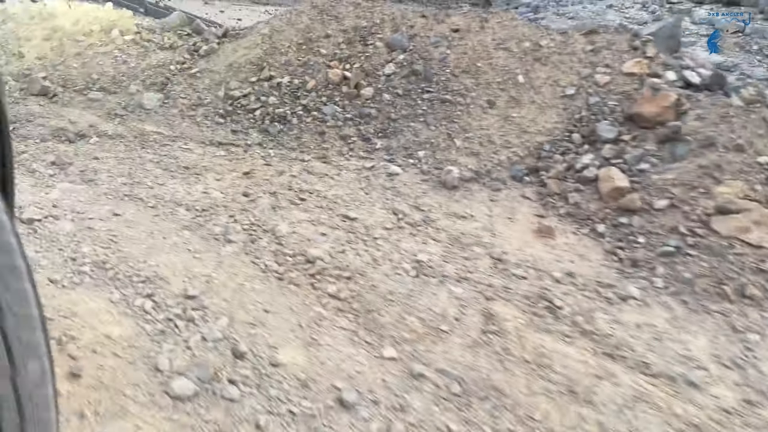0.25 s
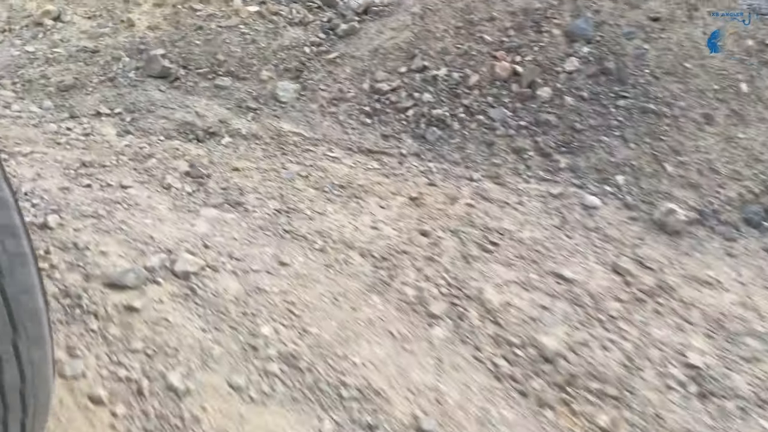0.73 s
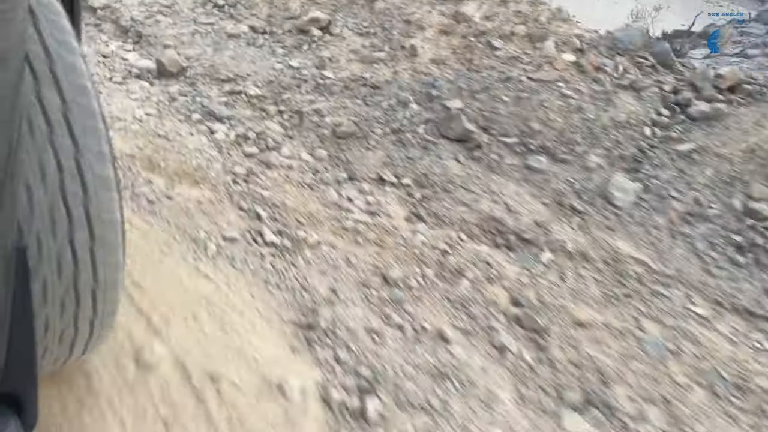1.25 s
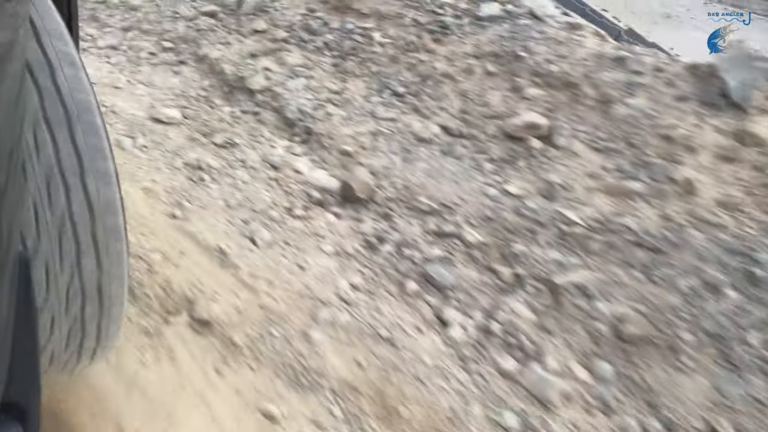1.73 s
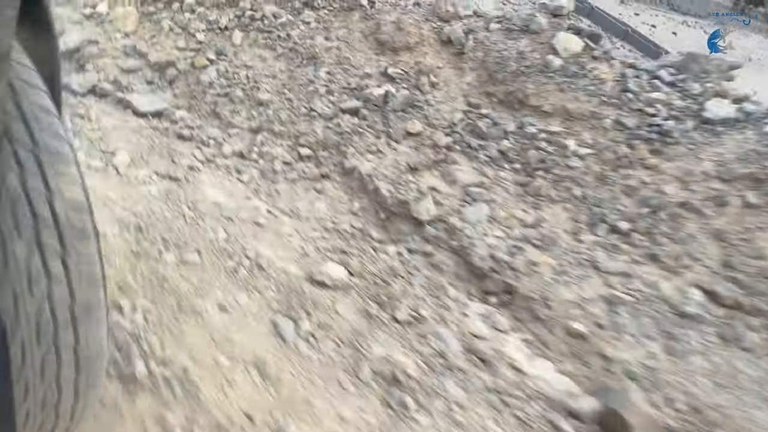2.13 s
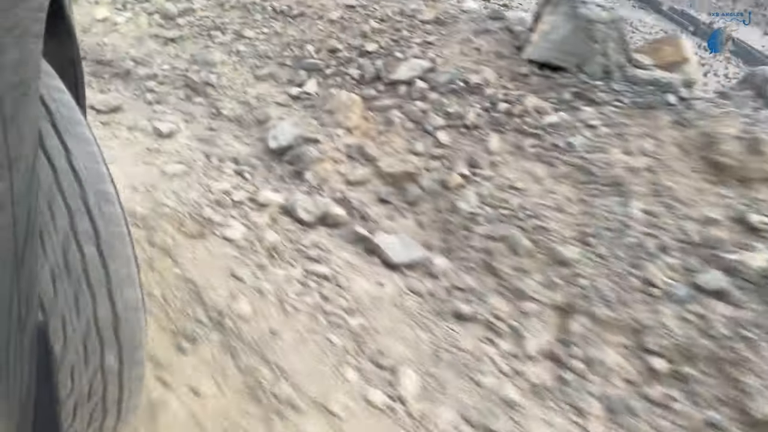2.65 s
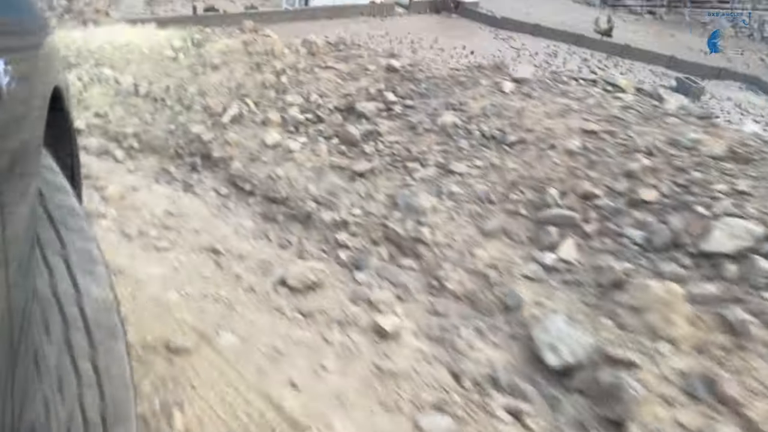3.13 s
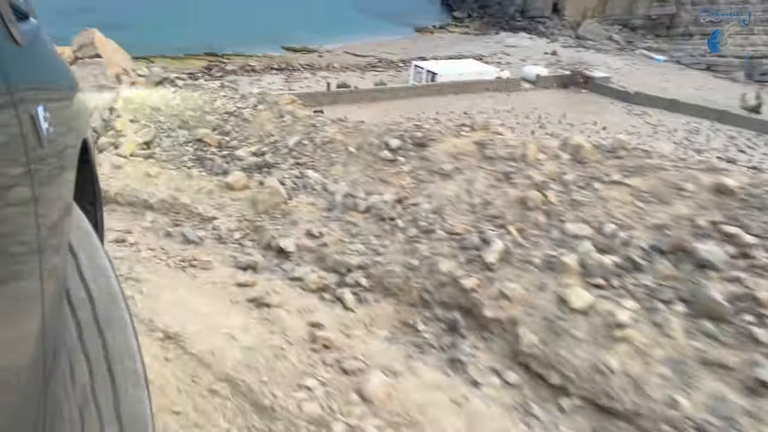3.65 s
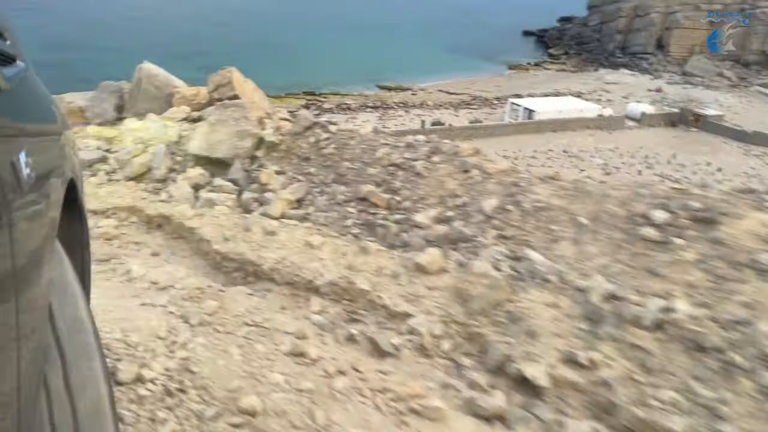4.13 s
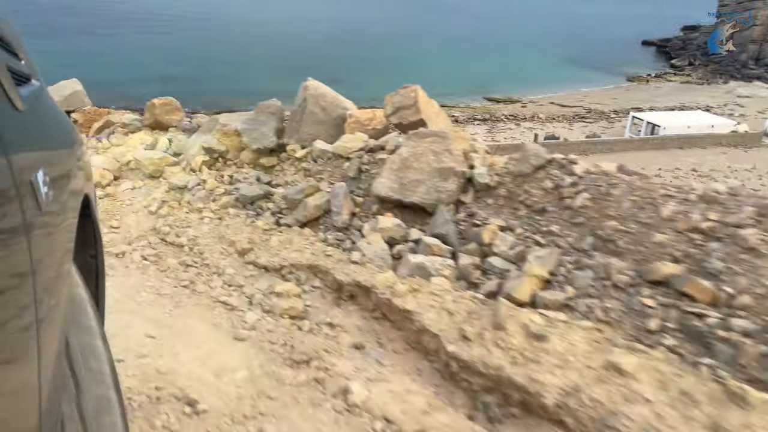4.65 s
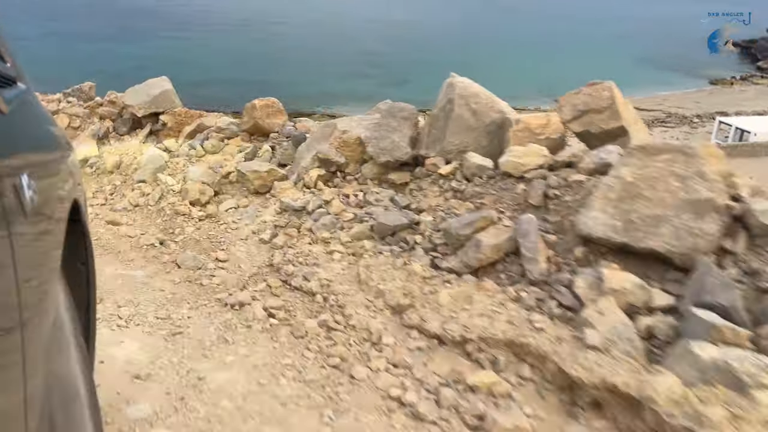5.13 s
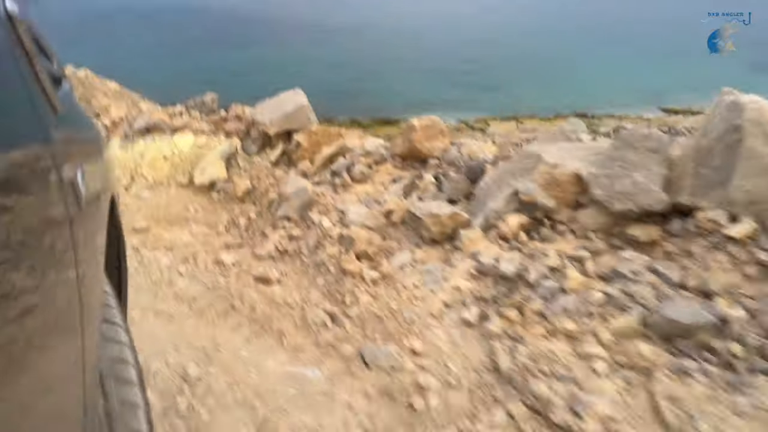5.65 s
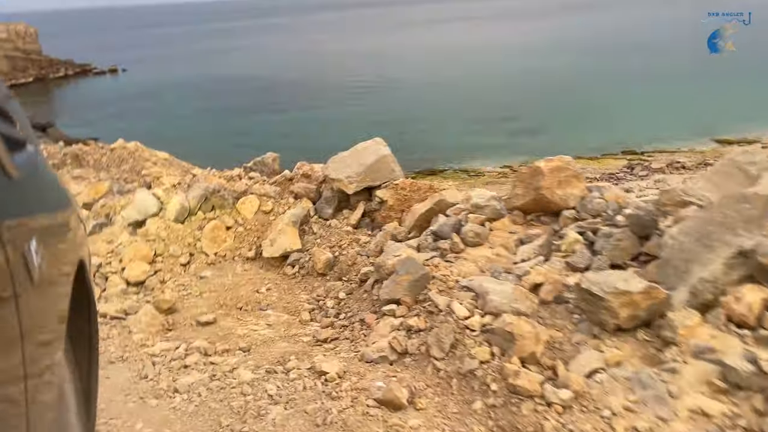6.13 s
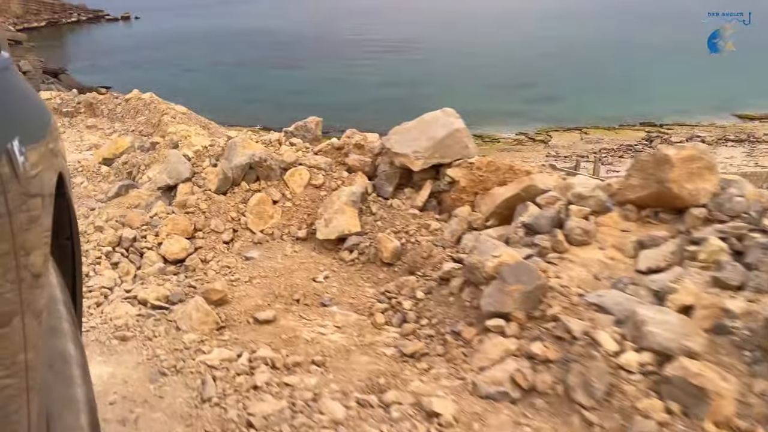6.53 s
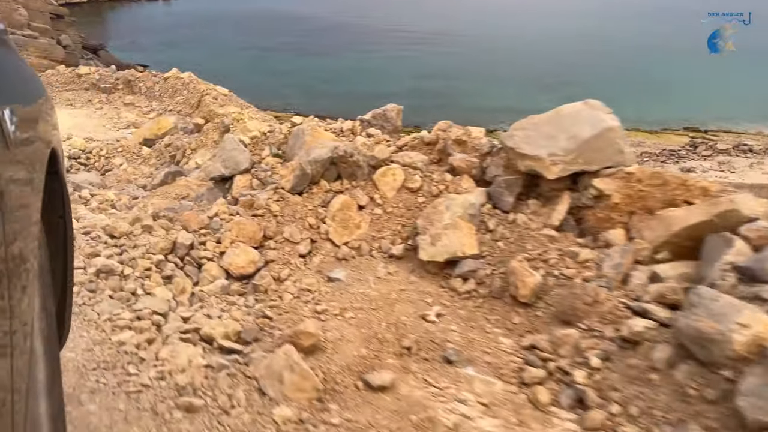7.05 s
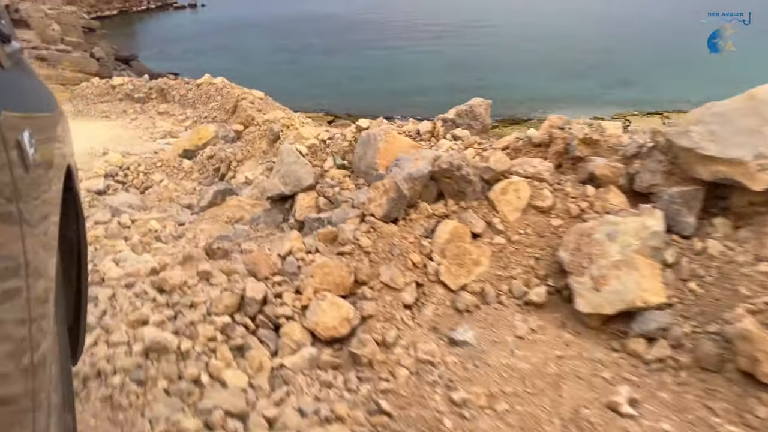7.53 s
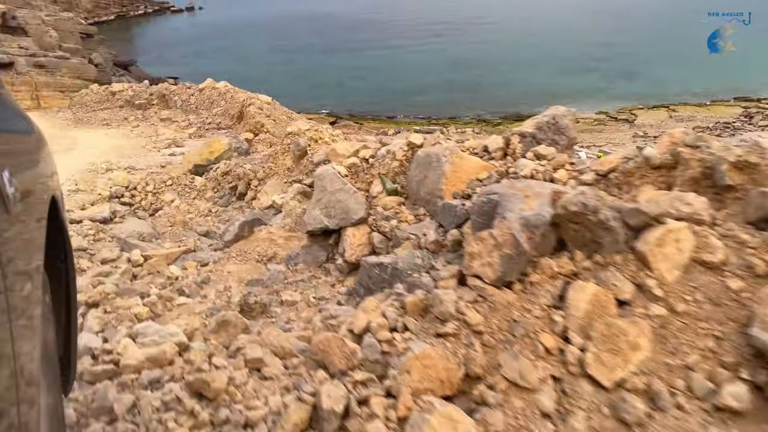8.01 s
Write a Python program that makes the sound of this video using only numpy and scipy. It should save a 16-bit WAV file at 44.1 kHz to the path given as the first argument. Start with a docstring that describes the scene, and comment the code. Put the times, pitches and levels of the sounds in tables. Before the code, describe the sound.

Car tyres roll slowly over loose gravel, stones crunching, popping and snapping under the tread with low thumps and a lumpy rumble beneath.

```python
"""Beside a slowly rolling car on loose gravel and rocks, a two-port microphone held close to the tyres.
Stones grind, snap and pop under the tread: filtered random clicks and short swings that sag in pitch.
The tyre thumps over bigger rocks as low decaying swings, and the bodywork rings through resonators.
Fine grit hisses, small stones tick, and lumpy low noise of car and wind lies below."""
import sys
import numpy as np
from scipy import signal
from scipy.fft import rfft, irfft, next_fast_len
from scipy.io import wavfile

SR = 44100
rng = np.random.default_rng(int(sys.argv[2]) if len(sys.argv) > 2 else 0)


def store_pcm(level_fs):
    """Save levels as 16-bit WAV."""
    pcm = np.round(np.clip(level_fs, -1, 1) * 32767).astype(np.int16)
    wavfile.write(sys.argv[1], SR, np.atleast_2d(pcm).T)


N = 365148


def from_db(db):
    """Decibels to gain."""
    return 10 ** (np.asarray(db) / 20)


def rms_one(x):
    """Scale to rms 1."""
    return x / np.sqrt(np.mean(x ** 2) + 1e-20)


def at_hz(points, hz):
    """Read a (frequency [Hz], level [dB]) table on a log-frequency axis."""
    table_hz, values = np.transpose(points)
    return np.interp(np.log(np.maximum(hz, 1)), np.log(table_hz), values)


def in_time(rows):
    """Read the columns of a timed table at every sample."""
    s, *columns = np.transpose(rows)
    return [np.interp(np.arange(N) / SR, s, column) for column in columns]


def band(x, low_hz, high_hz):
    """Causal band-pass."""
    return signal.sosfilt(signal.butter(2, [low_hz, high_hz], "band", fs=SR, output="sos"), x + 1e-18)


def drift(rate):
    """Slow random wander at about this many wobbles a second; rms about 1."""
    step = 40   # samples between the slow points
    r = np.exp(-2 * np.pi * step * rate / SR)
    noise = rng.standard_normal(N // step + 2002)
    slow = signal.lfilter([1], [1, -2 * r, r * r], noise)[2000:]
    return np.interp(np.arange(N) / step, np.arange(len(slow)), rms_one(slow))


def coloured(x, spectrum):
    """Give white input a spectrum through a causal (minimum-phase) filter."""
    size = 8192
    hz = np.arange(size // 2 + 1) * SR / size
    cepstrum = irfft(np.log(from_db(at_hz(spectrum, hz))))
    # folding the cepstrum forward makes the filter minimum-phase
    cepstrum[1:size // 2] *= 2
    cepstrum[size // 2 + 1:] = 0
    response = irfft(np.exp(rfft(cepstrum)))[:size // 2]
    return signal.fftconvolve(x, response[None], axes=-1)[:, :N]


def add(track, s, burst):
    """Mix a burst into a track from time s."""
    i = max(round(s * SR), 0)
    track[..., i:i + burst.shape[-1]] += burst[..., :N - i]


def add_peak(track, s, peak_db, burst):
    """Mix in a burst scaled to a peak level."""
    add(track, s, from_db(peak_db) * burst / np.abs(burst).max())


def blow(hz, cycles, rise, sag, phase):
    """A short swing that swells, dies and sags in pitch as the contact lets go; envelope peak 1."""
    turns = np.arange(round(cycles * 1.5 * SR / hz)) * hz / SR
    shape = (1 - np.exp(-turns / rise)) * from_db(-60 * turns / cycles)
    swing = np.sin(2 * np.pi * (turns + sag * (1 - np.exp(-turns))) + phase)
    return shape * swing / shape.max()


def grains(per_s, spread_db):
    """Two fields of random clicks of very uneven size; rms 1."""
    sizes = from_db(spread_db * np.minimum(rng.exponential(1, (2, N)), 3))
    signs = rng.choice([-1, 1], (2, N))
    return rms_one(sizes * signs * (rng.random((2, N)) < per_s / SR))


def stones(clicks, low_hz, high_hz, width, count):
    """Clicks are dealt to stones of many sizes, each ringing briefly at its own pitch; rms 1."""
    dealt = rng.integers(0, count, clicks.shape)
    pitches = np.geomspace(low_hz, high_hz, count)
    return rms_one(sum(band(clicks * (dealt == k), hz / width, hz * width) for k, hz in enumerate(pitches)))


def surges(crunch_db, per_s, t60, depth_db, after_pop_db):
    """Stones give way in patches, at random and after each pop: a gain that jumps and dies; rms 1."""
    starts = (rng.random(N) < per_s / SR) * np.minimum(rng.exponential(1, N), 2)
    s, peak_db = np.transpose(STONE_POPS)[:2]
    at = (s * SR).astype(int)
    starts[at] += from_db(peak_db - crunch_db[at] + after_pop_db)
    r = from_db(-60 / (t60 * SR))
    return rms_one(1 + from_db(depth_db) * signal.lfilter([1], [1, -r], starts))


# colour of stones grinding close to the microphone: (frequency [Hz], relative level [dB per Hz])
GRAVEL_COLOUR = [(90, -28.5), (150, 2), (230, -1), (350, -2), (500, -5.5), (860, -5.5), (1500, -12),
                 (1750, -16.5), (3000, -21.5), (5800, -32), (7900, -44), (10000, -38.5), (15800, -60.5)]
BED_DB = -6   # smooth noise bed under the grinding clicks


def gravel(crunch_db, grit_db):
    """Stones grind in surges: broad clicks, sharp chips and ringing stones over a smoother noise bed."""
    bed = rng.standard_normal((2, N)) * from_db(3.2 * drift(20))
    giving = surges(crunch_db, per_s=21, t60=0.067, depth_db=-4.5, after_pop_db=-5.0)
    broad = giving * grains(per_s=700, spread_db=1.5)
    big = giving * stones(grains(per_s=240, spread_db=3.6), 190, 1700, width=1.15, count=12)
    small = giving * stones(grains(per_s=1100, spread_db=3.3), 1900, 14000, width=1.25, count=8)
    chips = grains(per_s=45, spread_db=3.0)

    crunch = rms_one(band(broad + from_db(BED_DB) * bed, 232, 2040))
    crunch += from_db(-11.5) * rms_one(band(chips, 540, 2500))
    crunch += from_db(-3.0) * big

    grit = rms_one(band(bed + rng.standard_normal((2, N)), 3280, 21500))
    grit += from_db(-22.0) * rms_one(band(chips, 2700, 9000))
    grit += from_db(-3.5) * small

    crunch = from_db(crunch_db) * rms_one(coloured(crunch, GRAVEL_COLOUR))
    return crunch + from_db(grit_db) * rms_one(coloured(grit, GRAVEL_COLOUR))


# stones that pop and crumble under the tread:
# (time [s], level of the first swing [dB], settled pitch [Hz], bright snap against that level [dB])
STONE_POPS = [(0.022, -2, 670, -13), (0.307, -9.5, 544, -36), (0.517, -7.5, 740, -20),
              (0.803, -13.5, 750, -13), (1.018, -18.5, 323, -4), (1.086, -7, 600, -32),
              (1.092, -3.5, 780, -35), (1.107, -12.5, 438, -30), (1.241, -17.5, 550, 0),
              (1.281, -12, 420, -11), (1.39, -10.5, 640, -14), (1.665, -15, 565, -29),
              (1.787, -4, 800, -16), (1.827, -2, 765, -20), (1.83, -5, 341, -34), (1.979, -11.5, 560, -7),
              (2.23, -9.5, 1000, -43), (2.241, -19, 1070, -35), (2.261, -11, 990, -26),
              (2.266, -5.5, 795, -36), (2.309, -8, 840, -26), (2.322, -27, 850, -22),
              (2.508, -4.5, 510, -22), (2.517, -2.5, 800, -8), (2.53, -0.5, 339, -37),
              (2.541, -6.5, 336, -36), (2.554, -6.5, 351, -35), (2.611, -4.5, 664, -28),
              (2.652, -6.5, 343, -28), (2.694, -13, 286, -35), (2.713, -6.5, 554, -41),
              (2.742, -8, 433, -19), (2.876, -15, 870, -7), (2.927, -6, 1100, -21), (2.95, -3, 375, -38),
              (3.005, -4.5, 890, -31), (3.016, -1.5, 600, -47), (3.126, -12, 293, -25),
              (3.156, -9.5, 830, -59), (3.252, -5.5, 485, -10), (3.341, -8.5, 344, -47),
              (3.409, -7, 824, -6), (3.457, -8, 533, -27), (3.534, -17, 386, -35), (3.575, -5, 810, -3),
              (3.649, -7, 596, -37), (3.679, -9.5, 910, -30), (3.736, -10, 257, -31), (3.756, -4, 563, -27),
              (3.766, -6.5, 497, -47), (3.796, -3.5, 915, -36), (3.83, -5, 790, -36),
              (3.868, -15, 900, -31), (3.974, -3.5, 359, -36), (4.239, -11.5, 260, -1),
              (4.555, -28, 460, -37), (4.598, -14, 860, -33), (4.613, -9.5, 880, -45),
              (4.672, -6, 820, -21), (4.718, -8.5, 820, -6), (4.747, -9.5, 800, -28),
              (4.833, -15.5, 490, -6), (4.907, -13.5, 826, -12), (4.975, -8, 790, -30),
              (4.99, -11, 730, -38), (5.066, -10, 930, -28), (5.327, -13.5, 1080, -27),
              (5.775, -8.5, 630, -21), (6.024, 0.5, 585, -39), (6.105, -9.5, 910, -48),
              (6.119, -9, 402, -18), (6.191, -17.5, 293, -30), (6.216, -15.5, 236, -38),
              (6.28, -6, 343, -30), (6.752, -14, 1050, -3), (7.069, -17, 554, -20), (7.262, -18, 950, -26),
              (7.549, -14.5, 560, -17), (8.054, -13.5, 1040, -28), (8.183, -10, 774, -5)]
CRUMBLE_CYCLES, CRUMBLE_SPREAD = 54, 0.68   # shortest-scale t60 [cycles of the pitch]; most it lengthens [octaves]
SNAP_T60_S = 0.008   # how fast the bright snap dies
SAG_HZ = 450   # a swing starts half this above its settled pitch
POP_RING_S, POP_CYCLES = .011, 5.0   # swing length: a part that scales with SAG_HZ, and more for low stones


def pops():
    """Each pop is three short sagging swings, while the stone crumbles in a ragged run of clicks."""
    out = np.zeros(N)
    t = np.arange(4000) / SR
    for s, peak_db, hz, snap_db in STONE_POPS:
        for k in range(3):
            late, height, turn = rng.random(3)
            delay = .003 * k * k * late
            pitch = hz if k == 0 else 1000 * 2 ** (0.89 * height - .6)
            cycles = POP_RING_S * SAG_HZ + POP_CYCLES * SAG_HZ / pitch
            swing = blow(pitch, cycles, rise=1.0, sag=SAG_HZ / pitch / 2, phase=2 * np.pi * turn)
            add(out, s + delay, from_db(peak_db - 5 * k) * swing)

        t60 = CRUMBLE_CYCLES / hz * 2 ** (CRUMBLE_SPREAD * rng.uniform(0.45, 1))
        clicks = rng.standard_normal(len(t)) * (rng.random(len(t)) < 1500 / SR)
        crumbs = clicks + 0.21 * rng.standard_normal(len(t))
        dull = band(crumbs * from_db(-60 * t / t60), hz / 1.68, 1033)
        snap = band(crumbs * from_db(-60 * t / SNAP_T60_S), 1080, 2780)
        add_peak(out, s, peak_db - 6, dull)
        add_peak(out, s, peak_db + snap_db, snap)
    return out


# tyre lurching over a rock, and in the rows near 175-192 Hz a body panel ringing: (time of the fullest swing
# [s], relative level [dB], settled pitch [Hz])
LOW_THUMPS = [(0.31, -14.5, 55.3), (0.733, -21, 58), (1.038, -15, 75.6), (1.257, -9, 61.5),
              (1.648, -11.5, 67), (1.765, -16, 175), (1.844, -16, 180), (1.871, -11.5, 63.6),
              (2.142, -9.5, 66.4), (2.23, -10.5, 82), (2.412, -9, 79), (2.563, -5.5, 73),
              (2.626, -12, 174), (2.683, -14, 63.6), (2.751, -8, 62.4), (2.917, -8, 76), (3.033, -28, 106),
              (3.19, -9.5, 110), (3.433, -8, 83), (3.503, -21, 119), (3.587, -23, 66.4), (3.704, -8, 68.5),
              (3.767, -6, 103), (4.108, -9, 91), (4.193, -5, 76), (4.39, -11.5, 73), (4.461, -12.5, 56.7),
              (4.595, -21, 65), (4.658, -8, 73), (4.855, -8.5, 68), (5.059, -14.5, 123),
              (5.451, -20.5, 117), (5.701, -20, 111), (5.76, -20, 101), (6.134, -9.5, 192),
              (6.366, -20, 133), (6.829, -20.5, 108), (6.888, -17, 76), (7.541, -18, 80),
              (7.831, -43, 63.7)]
THUMP_CYCLES, THUMP_RISE = 5.24, 0.79   # t60 and time constant of the swell [cycles]
ONE_SIDE_DB = -1.5   # scales the random part of a thump that differs between the ports


def thumps():
    """The tyre body, or a ringing body panel, swells into a swing or two and settles; rows are common and one-
    port parts."""
    out = np.zeros((2, N))
    # cycles from the start of a swing to its fullest point
    lead = THUMP_RISE * np.log(1 + THUMP_CYCLES / (THUMP_RISE * np.log(1000)))
    for s, level_db, hz in LOW_THUMPS:
        turn, side = rng.random(2)
        swing = blow(hz, THUMP_CYCLES, THUMP_RISE, sag=0.26, phase=2 * np.pi * turn)
        one_port = from_db(ONE_SIDE_DB) * (4 * side - 2)
        add(out, s - lead / hz, from_db(level_db - 2.0) * swing * [[1], [one_port]])
    return out


# bodywork and wheel arch above the tyre: (frequency [Hz], level [dB], t60 [s])
BODY_MODES = [(180, -10.5, 0.22), (347, -23.5, 0.11), (873, -29.5, 0.036)]


def panel(knocks):
    """The bodywork rings on after each knock, one damped resonator per mode."""
    out = 0
    for hz, db, t60 in BODY_MODES:
        r, w = from_db(-60 / (t60 * SR)), 2 * np.pi * hz / SR
        ring = signal.lfilter([0, w * np.sin(w)], [1, -2 * r * np.cos(w), r * r], knocks + 1e-18)
        out = out + from_db(db) * ring
    return out


# small stones cracking: (time [s], relative level [dB], pitch [Hz], relative level of the top octave [dB])
STONE_TICKS = [(0.043, -30, 4460, -105), (0.141, -31, 2550, -68), (0.332, -37, 3330, -52),
               (0.685, -30, 2240, -63), (0.7155, -24.5, 2230, -45), (1.094, -28, 1980, -39),
               (1.1598, -35, 2640, -64), (2.034, -33.5, 4400, -79), (2.309, -22.5, 2080, -62),
               (2.4473, -26.5, 2940, -51), (2.4917, -28, 2000, -62), (2.51, -21, 2560, -57),
               (2.5576, -32, 2150, -44), (3.155, -27, 3420, -60), (3.535, -27.5, 2840, -67),
               (3.544, -23.5, 2940, -61), (3.5772, -28, 2080, -38), (3.627, -24, 2130, -59),
               (3.731, -22, 2380, -55), (3.756, -35, 2900, -48), (3.831, -21, 2050, -43),
               (3.883, -36, 2020, -33.5), (4.0044, -45, 2070, -46), (4.108, -22.5, 2150, -35),
               (4.2736, -26, 2200, -106), (4.3117, -20.5, 1880, -91), (4.4783, -34, 2370, -57),
               (4.599, -40, 2000, -81), (4.612, -19.5, 2020, -80), (4.644, -29, 2830, -56),
               (4.6964, -35, 2870, -45), (4.9054, -32, 3100, -59), (6.024, -24.5, 2040, -49),
               (6.747, -30, 2140, -114), (7.664, -29, 1900, -73)]


def ticks():
    """A noise click with a brief ring at the pitch of the stone and a thin top of its own strength."""
    out = np.zeros(N)
    fade = from_db(-60 * np.arange(400) / SR / 0.014)
    for s, level_db, hz, top_db in STONE_TICKS:
        click = rng.standard_normal(400) * fade
        # each band is filtered twice for steeper edges
        body = band(band(click, hz / 1.7, hz * 1.5), hz / 1.7, hz * 1.5)
        top = band(band(click, 8300, 14500), 8300, 14500)
        add_peak(out, s, level_db + 9.5, body)
        add(out, s, from_db(level_db + 3) * blow(hz, cycles=30, rise=1.5, sag=0, phase=0))
        add_peak(out, s, top_db + 7.0, top)
    return out


# a brief thin squeak: (time [s], level [dB], pitch [Hz])
THIN_SQUEAK = (3.07, -42, 10420)


def squeak():
    """One high steady tone that swells and dies."""
    out = np.zeros(N)
    s, peak_db, hz = THIN_SQUEAK
    add(out, s, from_db(peak_db) * blow(hz, cycles=1500, rise=250, sag=0, phase=0))
    return out


# fine grit sprays out with a short hiss: (time at the fullest [s], level [dB], length [s])
GRIT_SPRAYS = [(4.24, -41.5, 0.037), (4.687, -44, 0.04), (6.404, -55, .08), (8.15, -52, 0.3)]


def sprays():
    """Fine grit sprays out: puffs of bright noise that swell and fade."""
    t = np.arange(N) / SR
    puffs = sum(from_db(db) * np.exp(-(2 * (t - s) / length) ** 2) for s, db, length in GRIT_SPRAYS)
    return puffs * rms_one(band(rng.standard_normal((2, N)), 4500, 10400))


# colour of car and wind below the gravel: (frequency [Hz], relative level [dB per Hz])
RUMBLE_COLOUR = [(15, -67), (25, -13), (45, 5), (65, 7), (183, -6), (227, -11.5), (260, -15.5), (340, -8),
                 (570, -120)]


def rumble(level_db):
    """Low noise of car and wind in lumps, with small random knocks of the tyre wall."""
    lumps = from_db(2.9 * np.array([drift(20.0), drift(5.3)]))   # rows: common and one-port parts
    knocks = stones(grains(per_s=55, spread_db=2.0), 49.2, 233, width=1.16, count=6)
    source = lumps * rng.standard_normal((2, N)) + from_db(-21.0) * knocks
    return from_db(level_db) * rms_one(coloured(source, RUMBLE_COLOUR))


def air_hiss():
    """A faint steady band of noise at the top of the range."""
    return from_db(-67) * rms_one(band(rng.standard_normal((2, N)), 9000, 17000))


# balance of the two microphone ports: (frequency [Hz], left against right [dB])
PORT_LEAN = [(60, 0), (150, -1.5), (380, 0), (950, 0), (2380, 5.5), (5980, 3), (15000, -2)]
# the part that differs between the ports: (frequency [Hz], gain [dB])
PORT_APART = [(40, -16.5), (125, -2), (300, -9), (900, -14), (2500, -1), (6000, -4), (15000, -2)]
PORT_LAG_S, LAG_FADES_HZ = .00018, 3100   # right port's lag, and where it fades out


def ports(common, apart):
    """The left port is nearer the wheel: lows and mids arrive a little earlier, presence is louder."""
    size = next_fast_len(N + 4096)
    hz = np.arange(size // 2 + 1) * SR / size
    lag = np.exp(-2j * np.pi * hz * PORT_LAG_S / (1 + (hz / LAG_FADES_HZ) ** 8))
    lean = from_db(at_hz(PORT_LEAN, hz) / 2)
    both = rfft(common, size)
    own = rfft(apart, size) * from_db(at_hz(PORT_APART, hz))
    left = (both + own) * lean
    right = (both - own) * lag / lean
    return irfft(np.array([left, right]), size)[:, :N]


# the roll past the microphone: (time [s], crunch of the gravel [dB], low rumble [dB])
CAR_ROLL = [(0.0, -21, -24), (0.87, -26, -27.5), (1.2, -24.5, -22), (1.45, -24.5, -26), (2.03, -24, -20),
            (2.58, -20, -19), (3.27, -20, -16.5), (3.6, -15, -12), (3.74, -16.5, -16), (3.94, -19, -15.5),
            (4.38, -21.5, -22), (4.8, -21.5, -15.5), (5.4, -25, -30.5), (6.2, -22.5, -26.5),
            (6.46, -27, -28), (7.17, -29, -28), (7.63, -26, -23.5), (8.28, -27.5, -27)]
GRIT_DB, GRIT_FOLLOWS = -42.5, 0.45   # fine grit at mean crunch; share of the crunch's swing in dB


def scene():
    """Gravel and rumble follow the roll; the louder stones and rocks are played one by one."""
    crunch_db, rumble_db = in_time(CAR_ROLL)
    grit_db = GRIT_DB + GRIT_FOLLOWS * (crunch_db - crunch_db.mean())
    lurch = thumps()
    common, apart = gravel(crunch_db, grit_db) + lurch + sprays() + rumble(rumble_db) + air_hiss()
    knocks = pops()
    common = common + knocks + panel(knocks + lurch[0]) + ticks() + squeak()
    return ports(common, apart)


def record(dry):
    """The loudest peaks are rounded off at full scale, then the top is cut at 15.9 kHz."""
    limited = dry / (1 + np.abs(dry) ** 6) ** (1 / 6)
    return signal.sosfilt(signal.ellip(12, .5, 70, 15900, fs=SR, output="sos"), limited)


dry = scene()
out = record(dry)
store_pcm(out)
```